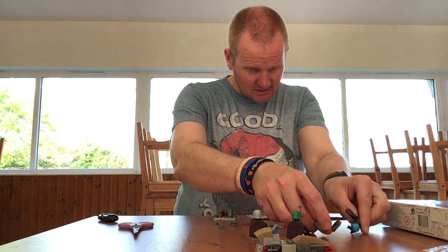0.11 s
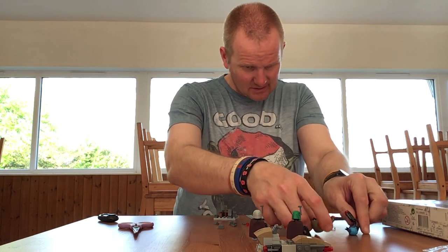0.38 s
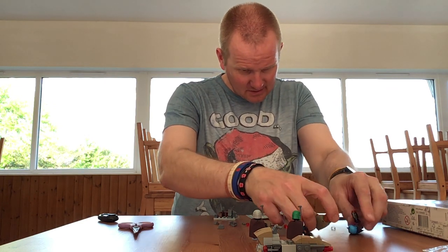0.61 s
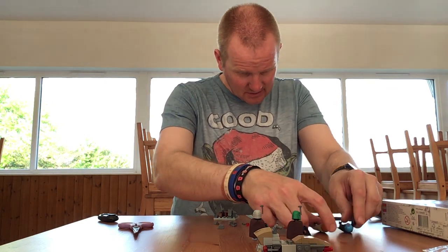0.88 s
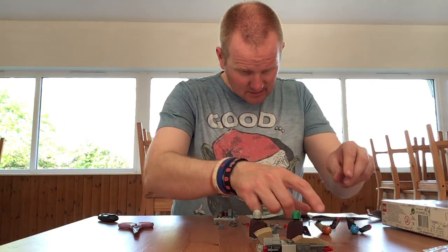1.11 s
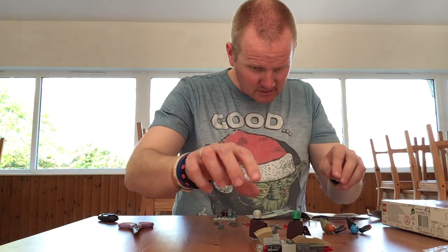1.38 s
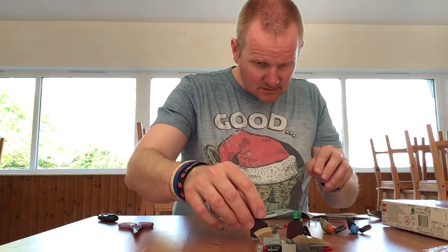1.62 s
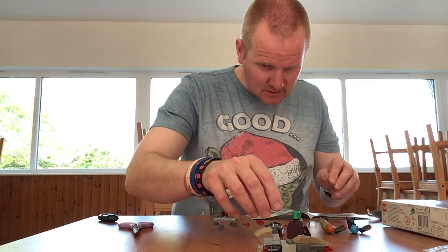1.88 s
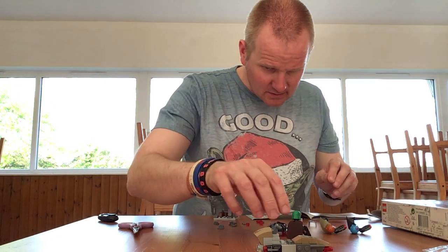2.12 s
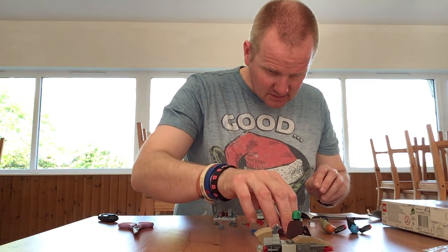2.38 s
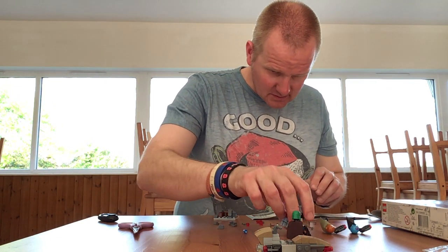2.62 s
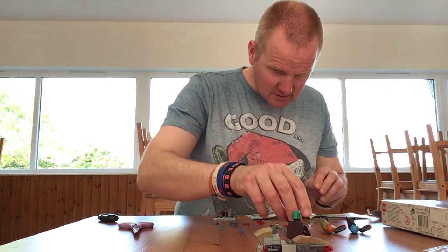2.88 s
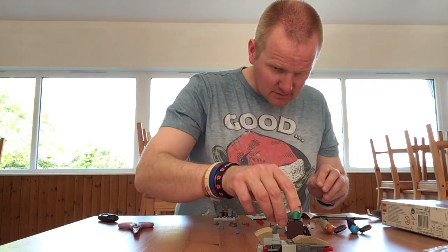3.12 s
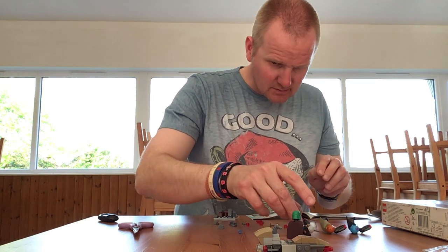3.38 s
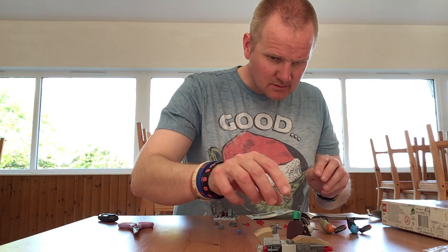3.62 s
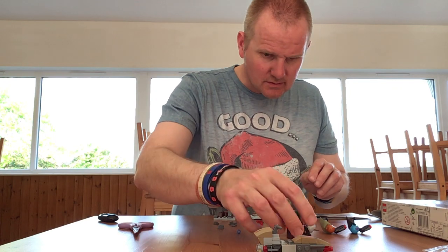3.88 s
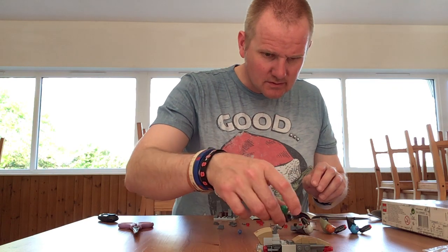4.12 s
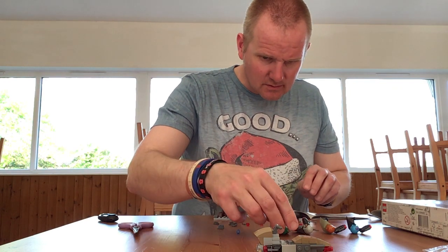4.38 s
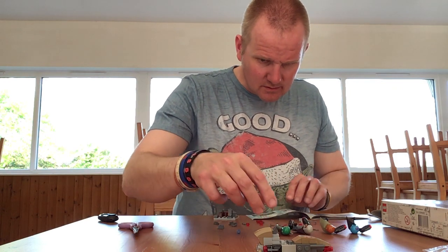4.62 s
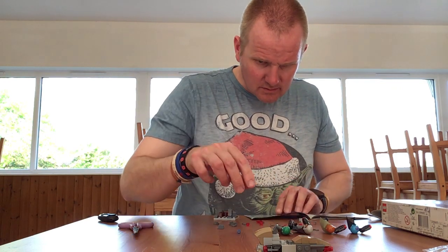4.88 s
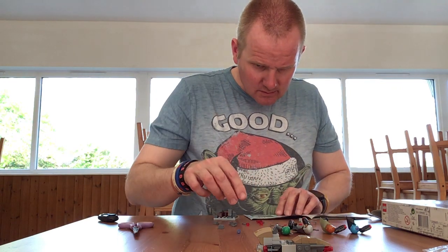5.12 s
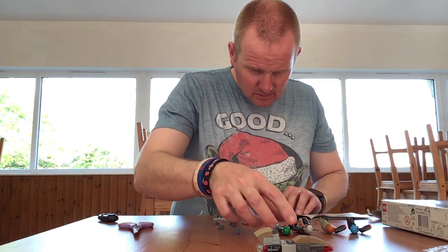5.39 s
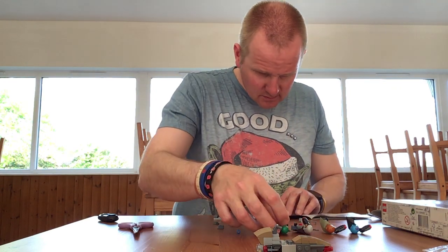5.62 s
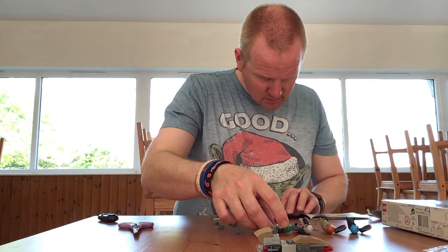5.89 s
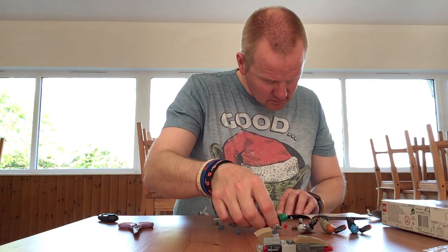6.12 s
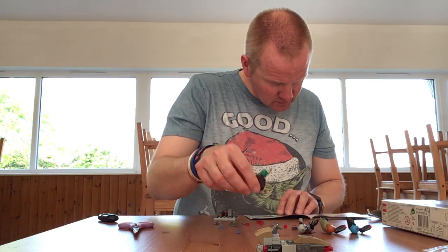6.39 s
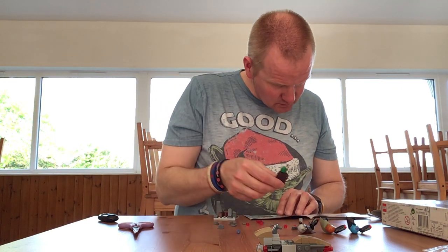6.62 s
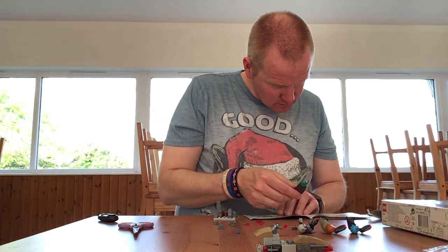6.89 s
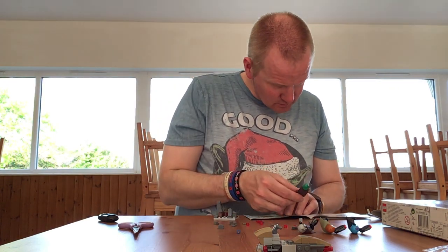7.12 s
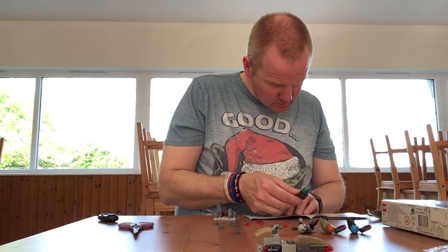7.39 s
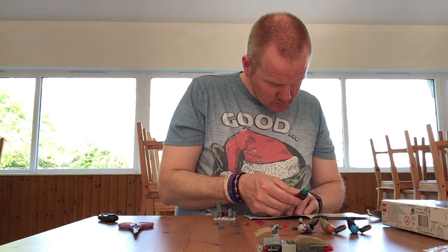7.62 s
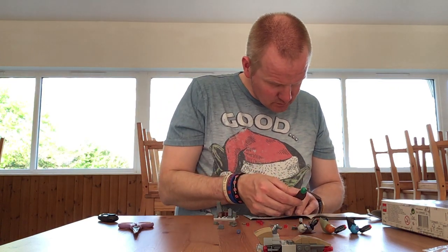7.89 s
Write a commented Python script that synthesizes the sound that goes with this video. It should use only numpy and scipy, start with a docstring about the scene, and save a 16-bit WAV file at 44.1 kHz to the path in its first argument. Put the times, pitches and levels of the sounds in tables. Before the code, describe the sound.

Small hollow plastic pieces are handled on a wooden table in a bare, reverberant hall. A knock and short slides come first, then a cluster of bright clacks peaking at two seconds. Scattered knocks, scrapes and rubs follow, thinning out until one last clear click near six seconds, then quiet room noise. A single nearby microphone picks up each contact with its echo.

```python
"""Small plastic toy pieces are pushed, dropped and knocked over on a wooden table in a bare hall.
Over a quiet noise floor the first push slides along the table: tiny slips excite its resonant modes,
and the hall's decaying noise tail follows each sound. Then come low thumps, rustling rubs, clicks of hollow
plastic and knocks of the table top, all sums of damped modes; the hardest click falls near 2 s.
Sparser contacts follow until the last rub, and the floor remains."""
import sys
import numpy as np
from scipy import signal
from scipy.fft import rfft, irfft, next_fast_len
from scipy.io import wavfile

SR = 44100
rng = np.random.default_rng(int(sys.argv[2]) if len(sys.argv) > 2 else 0)


def ratio(d):
    """dB to gain"""
    e = np.asarray(d, float) / 20
    return 10 ** e


def pcm_store(signal):
    """Save signal as 16-bit PCM."""
    levels = np.round(np.clip(np.atleast_2d(signal), -1, 1) * 32767)
    wavfile.write(sys.argv[1], SR, levels.astype(np.int16).T)


N = 353354

# Spectral shape of the floor: frequency_hz, relative_density_db (per Hz)
FLOOR_SPECTRUM = [(15, -61), (25, -21), (35, -43.5), (49, -6), (189, -2), (262, -5), (299, -9.5),
                  (333, -8.5), (528, -14.5), (791, -21.5), (2970, -26), (12100, -34), (15800, -41)]
# Pieces pushed over the table top: start_s, length_s, level_db, favoured_hz
TABLE_SLIDES = [(0, 0.71, -63, 478), (0.707, 0.067, -60, 575), (0.742, 0.08, -53.5, 400),
                (0.757, 0.11, -61, 1265), (0.798, 0.045, -53.5, 1050), (0.825, 0.092, -51, 467),
                (0.912, 0.042, -50, 588), (0.969, 0.078, -60, 433), (1.177, 0.067, -54.5, 497),
                (1.302, 0.18, -63, 1185), (1.552, 0.29, -64, 636), (2.388, 0.06, -54, 430),
                (2.449, 0.08, -48.5, 603), (2.544, 0.16, -44.5, 627), (2.924, 0.086, -54, 660),
                (3.031, 0.046, -55.5, 654), (3.315, 0.13, -61.5, 615), (3.62, 0.046, -67, 607),
                (4.347, 0.15, -71, 770), (5.414, 0.3, -65.5, 404), (5.689, 0.16, -59, 442),
                (5.79, 0.098, -56, 400), (5.844, 0.19, -60, 453), (5.962, 0.26, -66, 480)]
# Pieces landing on the table: contact_s, knock_db, favoured_hz, upper_modes_db (relative to the knock),
# skid_db (sliding after the landing)
TABLE_KNOCKS = [(0.267, -30.5, 484.7, 5, -47.5), (0.464, -58, 467, 11, -72), (0.877, -42.5, 534, -21, -77),
                (1.061, -45, 455, 10.5, -47.5), (1.132, -49.5, 466, -11, -48), (1.146, -43, 464, -2, -54),
                (1.408, -53, 466, -14, -56), (1.443, -57, 468, 3, -49), (1.716, -45.5, 660, -7, -60.5),
                (1.826, -38, 656, 1, -42.5), (1.873, -39, 1005, 8, -43.5), (1.973, -43.5, 520, 11.5, -38.5),
                (2.0, -36.5, 618, 20, -37), (2.054, -35, 506, 13, -35.5), (2.414, -40, 442.6, 3, -63),
                (2.554, -50, 660, 9, -56), (2.7, -52, 613, -5, -53.5), (2.666, -45, 611, 3.5, -51),
                (2.86, -32.5, 535, 6, -45.5), (2.887, -47, 825, 10.5, -44), (3.395, -60, 604, -8, -52),
                (3.416, -45.5, 665, -21, -66.5), (3.521, -58.5, 610, -13, -65),
                (4.241, -65, 1220, 6, -58.5), (4.289, -36, 607, -17, -44), (4.3, -34.5, 754, -6, -45),
                (4.317, -38, 770, -17, -52.5), (4.514, -54, 467, -19, -61), (4.565, -66, 590, -5, -67),
                (5.539, -56, 443, -1, -67), (5.632, -61.5, 654, 4, -59.5), (5.979, -63, 610, -10.5, -64),
                (6.052, -62, 610, -8, -59), (6.079, -46.5, 632, -16, -44.5), (6.122, -57, 633, 10, -50),
                (6.128, -51.5, 1265, 7, -68)]
# Modes of the table top: mode_hz, relative_level_db, t60_s
TABLE_MODES = [(330, -3, 0.63), (358, -5, 0.28), (430, -6, 0.088), (468, -1.5, 0.072), (515, 2, 0.0094),
               (561, -10, 0.017), (608.3, -1, 0.12), (660, -5, 0.072), (720, -9, 0.058), (770, -1.5, 0.063),
               (845, -7.5, 0.12), (930, -3.5, 0.019), (1054, -3, 0.028), (1182, -3, 0.013),
               (1265, -2, 0.032), (1426, -9, 0.089), (1630, -1.5, 0.0076), (1950, -22.5, 0.09)]
# Reverberation time of the hall: frequency_hz, t60_s
HALL_DECAY = [(100, 2.1), (400, 1), (1300, 1.17), (3000, 1.3), (5000, 1.1), (9000, 0.64), (14000, 0.5)]
# Hall tail against the direct sound, before its build-up: frequency_hz, level_db
HALL_LEVEL = [(100, -14), (400, -12), (1300, -6.5), (3000, -10.5), (5000, -7), (9000, -8), (14000, -9.5)]
# Hand or heavy piece pressing on the table: contact_s, level_db
HAND_THUMPS = [(0.121, -67), (0.176, -68.5), (0.265, -68), (0.837, -78), (1.146, -69), (1.825, -62.5),
               (1.871, -62.5), (1.973, -62), (2.001, -55), (2.054, -58.5), (2.415, -74), (2.886, -67.5),
               (4.3, -61.5), (4.513, -61.5), (4.565, -66.5), (5.539, -71.5), (5.631, -70), (5.978, -70),
               (6.08, -63.5), (6.123, -74)]
# Lowest modes of the table: mode_hz, relative_level_db, t60_s
LOW_TABLE_MODES = [(78, 1, 0.11), (120.3, 2, 0.58), (171.6, -1.5, 0.21), (225.7, -2, 0.25),
                   (280.5, -9.5, 0.23)]
# Pieces rubbing on each other and on fingers: start_s, length_s, body_db, rustle_db, rustle_hz
PIECE_RUBS = [(0.203, 0.28, -71.5, -71.5, 7550), (0.262, 0.029, -54.5, -54, 9500),
              (0.743, 0.1, -63, -67, 9370), (0.797, 0.098, -58.5, -66.5, 7300),
              (0.927, 0.16, -91, -75.5, 7500), (1.057, 0.059, -71, -63.5, 9500),
              (1.131, 0.13, -72, -67.5, 9500), (1.303, 0.19, -74.5, -76, 7390),
              (1.442, 0.055, -78, -67.5, 9700), (1.563, 0.17, -65, -71.5, 7700),
              (1.706, 0.17, -71.5, -69.5, 7540), (1.824, 0.027, -61.5, -60, 8150),
              (1.865, 0.074, -56, -59, 9400), (1.967, 0.055, -60, -65, 9450), (2.01, 0.1, -62, -63, 9600),
              (2.079, 0.039, -47.5, -66, 7000), (2.403, 0.045, -58, -61.5, 9300),
              (2.438, 0.13, -65, -66, 7900), (2.549, 0.2, -66, -69, 6840), (2.73, 0.34, -75.5, -72, 7460),
              (2.883, 0.034, -63, -59.5, 9500), (2.921, 0.06, -65, -63.5, 8400),
              (3.036, 0.03, -70, -66, 8200), (3.29, 0.11, -74, -73.5, 8500),
              (3.38, 0.11, -68.5, -72.5, 7800), (3.996, 0.048, -74, -68, 9550),
              (4.243, 0.1, -71.5, -81, 6730), (4.285, 0.049, -58, -60.5, 7800),
              (4.304, 0.048, -52.5, -57.5, 11030), (4.505, 0.024, -74.5, -66, 6390),
              (4.563, 0.024, -70, -57, 10000), (5.403, 0.81, -75.5, -78.5, 7700),
              (5.723, 0.2, -66.5, -75, 7100), (5.835, 0.5, -77.5, -75, 7300),
              (6.064, 0.09, -66.5, -59, 7540), (6.115, 0.036, -49, -62, 6940),
              (6.162, 0.09, -67.5, -61, 6900), (6.324, 0.063, -79, -67, 7350),
              (6.416, 0.078, -80.5, -70, 7300), (6.682, 0.066, -85, -73.5, 7470)]
# Modes of the hollow pieces: mode_hz, relative_level_db, t60_s
PIECE_MODES = [(2020, -2.5, 0.01), (2260, -5, 0.086), (2600, -4, 0.054), (2820, -3.5, 0.093),
               (3013, -7, 0.066), (3184, -6.5, 0.038), (3540, -3.5, 0.051), (3840, -1.5, 0.026),
               (4400, -5.5, 0.045), (4810, -3.5, 0.036), (5000, -6.5, 0.024), (5330, -2, 0.0077),
               (5880, -1, 0.0049), (6790, -9.5, 0.017), (7580, -12, 0.012), (8200, -16.5, 0.0065),
               (8230, -8, 0.0045), (9450, -13.5, 0.0054), (9510, -11.5, 0.0073), (10500, -10, 0.0048),
               (11070, -12.5, 0.0092), (11600, -21, 0.006), (13200, -14.5, 0.0062), (13900, -49, 0.0036)]
# Plastic on plastic: contact_s, level_db, favoured_hz, upper_middle_db, treble_db (both relative to level_db)
PLASTIC_CLICKS = [(0.266, -38.5, 2600, 0.5, 9), (0.746, -61, 3300, 3, -1), (0.802, -52, 3520, 8, -7),
                  (0.8108, -57, 3400, -4.5, -6), (0.7532, -59, 2930, 3, 2), (0.85, -60, 3500, -9, -6),
                  (0.868, -53, 3520, -2, -4), (0.877, -60, 3000, -6, -6), (0.9327, -52.5, 3870, -4, 6),
                  (1.0622, -38.5, 9300, -14, -19), (1.1294, -42.5, 3540, -12, -4),
                  (1.1446, -43, 9600, -10.5, 3.5), (1.1634, -64, 9300, -8, 4),
                  (1.1836, -54.5, 3550, -0.5, -2), (1.4391, -59, 8700, -3, -5.5),
                  (1.567, -65, 3000, -8, -1), (1.714, -60, 7500, -15, 10), (1.8261, -47, 2600, -24, 9),
                  (1.8726, -27, 2676, -2, 6), (1.901, -40, 2770, -16, 1), (1.9144, -40, 2670, -14.5, -4),
                  (1.973, -44.5, 2200, 5, 14), (1.9998, -14, 2757, -9, 5.5), (2.0064, -23.5, 2190, -11, 5),
                  (2.0428, -37.5, 2800, -16.5, 2), (2.0538, -24.5, 2360, -6, 4.5),
                  (2.085, -28.5, 2400, -18, 2), (2.0984, -37, 2680, -17, 0), (2.41, -55, 4330, 5.5, -3),
                  (2.5463, -45.5, 3140, -15, -6), (2.5925, -50, 2800, -8.5, -0.5),
                  (2.859, -31, 2690, -9.5, -5), (2.8863, -41.5, 2720, -18, -3.5),
                  (2.929, -46, 2670, -7.5, 2.5), (3.041, -64.5, 8330, -17, 8),
                  (3.9963, -61.5, 7840, -11, 9), (4.291, -47, 2290, -10.5, 16.5),
                  (4.302, -41, 2290, -9, -1.5), (4.325, -42.5, 3530, -0.6, 0),
                  (4.5116, -62.5, 5930, 3.5, 11), (4.568, -62, 10000, -16, 1), (5.021, -59, 5830, -5, 5),
                  (5.121, -61.5, 2260, 3.5, -10.5), (5.5383, -61, 2700, 0, 5), (5.661, -63.5, 8000, -8, 12),
                  (5.73, -65, 2910, -3, 2), (6.0785, -51, 6760, 2.5, 2), (6.095, -61, 7880, 11.5, 21),
                  (6.122, -27, 2600, 3, 2)]
# Edge of a hard contact: mode_hz, relative_level_db, t60_s
CRACK_MODES = [(4100, -7, 0.0063), (9100, -14.5, 0.0018), (13600, -26, 0.0014)]

FLOOR_RMS_DB = -65.5
UPPER_FROM_HZ, TREBLE_FROM_HZ, TOP_FROM_HZ = 3300, 6200, 11500   # regions of the pieces' spectrum
HELD_T60_S, LOADED_T60_S = .008, .04   # longest ring of a piece lying in the heap, of the table under a blow
KNOCK_CHATTER_S, CLICK_CHATTER_S = .004, .0016   # scale of the random rebound spacing
SKID_S = .05   # how long a landed piece skids
GRIP_RING_SHARE, RUB_BODY_HZ = .45, 3100   # ring time left under fingers; centre of the stirred body modes
FIRST_TOUCH_DB, FIRST_REBOUND_DB, REBOUND_LOSS_DB = -8, -6, 1.8   # against the firm contact; loss per rebound
TOP_PER_DB, HARD_BLOW_DB = .3, -14   # extra loss of the top per dB that a blow is softer than a hard one


def at_hz(points, hz):
    """Interpolates a frequency table linearly on a logarithmic frequency axis."""
    table_hz, values = np.transpose(points)
    return np.interp(np.log(np.maximum(hz, 1)), np.log(table_hz), values)


def rms_one(x):
    """Normalises mean power to one."""
    return x / np.sqrt(np.mean(x ** 2) + 1e-20)


def low_cut(x, hz):
    """Second-order high-pass: attenuates the spectrum below its cutoff."""
    return signal.sosfilt(signal.butter(2, hz, "high", fs=SR, output="sos"), x)


def high_cut(x, hz):
    """Second-order low-pass: attenuates the spectrum above its cutoff."""
    return signal.sosfilt(signal.butter(2, hz, fs=SR, output="sos"), x)


def ring(impulses, hz, t60):
    """Damped resonator: a unit impulse excites a decaying sine of initial height 1."""
    radius = ratio(-60 / (t60 * SR))
    angle = 2 * np.pi * hz / SR
    feedback = [1, -2 * radius * np.cos(angle), radius * radius]
    return signal.lfilter([0, np.sin(angle)], feedback, impulses + 1e-18)


def favour(modes, hz, octave_db, peak_db):
    """Modal selectivity: a contact excites most the modes nearest its favoured pitch."""
    octaves = np.abs(np.log2(np.array(modes)[:, 0] / hz[:, None]))
    slope_db = -octave_db * np.minimum(octaves, 1.3)
    return slope_db + peak_db * np.exp(-(octaves / .06) ** 2)


def strike(times, chatter_s, strength_db, modes, longest_s=1):
    """Impact excitation: light touch, firm contact and weaker rebounds; strength_db is blows x modes."""
    gaps = .2 + rng.random((len(times), 8))
    lag = np.cumsum(gaps, axis=1) / 2 * chatter_s
    contact_s = times[:, None] + lag - lag[:, 1:2]      # the firm contact, second in line, falls on the listed time
    at = np.clip((contact_s * SR).astype(int), 0, N - 1)
    push_db = np.r_[FIRST_TOUCH_DB, 0, FIRST_REBOUND_DB - REBOUND_LOSS_DB * np.arange(6)]
    out = np.zeros(N)
    for k, (hz, db, t60) in enumerate(modes):
        spot_db = 2.0 * rng.standard_normal(at.shape)      # each touch meets the mode at another spot
        impulses = np.zeros(N)
        np.add.at(impulses, at, ratio(push_db + spot_db + db + strength_db[:, k:k + 1]))
        sense = (-1) ** k      # neighbouring modes move in opposite senses
        out += sense * ring(impulses, hz, min(t60, longest_s))
    return out


def scrape(starts, lengths, level_db, focus_db, modes, per_s, ring_share, grit_db):
    """Frictional excitation: dense, uneven slips drive the modes under a quickly rising, fading pressure."""
    sizes = ratio(grit_db * np.minimum(rng.exponential(1, N), 5)) * rng.choice([-1, 1], N)
    slips = rms_one(sizes * (rng.random(N) < per_s / SR))
    dealt = rng.integers(0, 3, N)      # each slip reaches one third of the modes
    share = ratio(np.array(modes)[:, 1] + focus_db)
    share *= ratio(level_db)[:, None] / np.sqrt(np.sum(share ** 2, axis=1, keepdims=True))
    out = np.zeros(N)
    for k, (mode_hz, _, t60) in enumerate(modes):
        pressure = np.zeros(N)
        for start, length, gain in zip(starts, lengths, share[:, k]):
            u = np.linspace(0, 1, max(int(length * SR), 2))      # progress through the stroke
            first = int(start * SR)
            envelope = np.minimum(u / 0.021, 1) * np.minimum((1 - u) / 0.66, 1)
            pressure[first:first + len(u)] += gain * envelope
        ring_s = t60 * ring_share
        even_power = np.sqrt(12 * np.log(1000) / (ring_s * SR))      # offsets ring time and the one-third share
        out += ring(slips * (dealt == k % 3) * pressure, mode_hz, ring_s) * even_power
    return out


def floor():
    """Stationary noise: random phases under a fixed spectrum give building rumble and microphone hiss."""
    size = next_fast_len(N)
    shape = ratio(at_hz(FLOOR_SPECTRUM, np.arange(size // 2 + 1) * SR / size))
    noise = irfft(rfft(rng.standard_normal(size)) * shape, size)[:N]
    return ratio(FLOOR_RMS_DB) * rms_one(noise)


def slides():
    """Sliding friction: pushed pieces, and landed pieces that skid, excite the table's modes."""
    skids = [(s, SKID_S, skid_db, hz) for s, _, hz, _, skid_db in TABLE_KNOCKS]
    s, length, db, hz = np.transpose(list(TABLE_SLIDES) + skids)
    focus_db = favour(TABLE_MODES, hz, octave_db=10.0, peak_db=7.0)      # a light piece stirs mostly one mode
    table = scrape(s, length, db, focus_db, TABLE_MODES, per_s=4000.0, ring_share=1.22, grit_db=2.5)
    return low_cut(high_cut(table, hz=2200.), hz=224.0)


def hall(x, gap_s=0.004, build_s=0.0066):
    """Reverberation: noise builds up after the first wall echo and decays exponentially band by band."""
    t = np.arange(SR * 3 // 2) / SR
    edges = 60 * 2 ** np.arange(0, 8.1, .5)      # half-octave bands
    tail = np.zeros(len(t))
    for low, high in zip(edges, edges[1:]):
        band_filter = signal.butter(2, [low, high], "band", fs=SR, output="sos")
        band = signal.sosfilt(band_filter, rng.standard_normal(len(t)))
        hz = np.sqrt(low * high)
        t60 = at_hz(HALL_DECAY, hz)
        decay = ratio(at_hz(HALL_LEVEL, hz) - 60 * t / t60)
        tail += band * decay * np.sqrt(2 * np.log(1000) / (t60 * SR))      # equal energy for any t60
    tail *= 1 - np.exp(-np.maximum(t - gap_s, 0) / build_s)
    return signal.fftconvolve(x, tail)[:N]


def thumps():
    """Low-mode excitation: the weight of a hand or heavy piece sets the table's lowest modes ringing."""
    s, db = np.transpose(HAND_THUMPS)
    strength_db = np.outer(db, np.ones(len(LOW_TABLE_MODES)))
    thump = strike(s, 0, strength_db, LOW_TABLE_MODES)      # zero spacing: all touches coincide
    return high_cut(thump, hz=400.)


def rubs():
    """Friction between pieces and fingers: slips excite the damped hollow bodies and a fine treble rustle."""
    s, length, body_db, rustle_db, rustle_hz = np.transpose(PIECE_RUBS)
    low = [mode for mode in PIECE_MODES if mode[0] < TREBLE_FROM_HZ]
    high = [mode for mode in PIECE_MODES if mode[0] > TREBLE_FROM_HZ]
    broad_db = favour(low, np.full(len(s), RUB_BODY_HZ), octave_db=5.0, peak_db=4)
    bodies = scrape(s, length, body_db, broad_db, low, per_s=900.0, ring_share=GRIP_RING_SHARE, grit_db=1.0)
    fine_db = favour(high, rustle_hz, octave_db=9.0, peak_db=7.0)
    rustle = scrape(s, length, rustle_db, fine_db, high, per_s=1500.0, ring_share=.7, grit_db=1.0)
    bodies = low_cut(high_cut(bodies, hz=7500.), hz=1540.0)
    return bodies + low_cut(high_cut(rustle, hz=12970.0), hz=4440.0)


def clicks():
    """Impact of hard faces: short body modes and a contact crack, with more top the harder the blow."""
    s, db, hz, upper_db, treble_db = np.transpose(PLASTIC_CLICKS)
    pitch = np.array(PIECE_MODES)[:, 0]
    top_db = TOP_PER_DB * (db - HARD_BLOW_DB)
    tilt_db = np.outer(upper_db, (pitch > UPPER_FROM_HZ) & (pitch < TREBLE_FROM_HZ))
    tilt_db += np.outer(treble_db, pitch > TREBLE_FROM_HZ)
    tilt_db += np.outer(top_db, pitch > TOP_FROM_HZ)
    strength_db = db[:, None] + tilt_db + favour(PIECE_MODES, hz, octave_db=8.0, peak_db=7.5)
    body = strike(s, CLICK_CHATTER_S, strength_db, PIECE_MODES, HELD_T60_S)
    crack_db = db[:, None] + np.stack([upper_db, treble_db, treble_db + top_db], axis=1)
    crack = strike(s, CLICK_CHATTER_S, crack_db, CRACK_MODES)
    return low_cut(high_cut(body + crack, hz=13000.), hz=1300.)      # small pieces move no air at low pitch


def knocks():
    """Plate impact: a landing piece excites the table's modes according to where it lands."""
    s, db, hz, upper_db, _ = np.transpose(TABLE_KNOCKS)
    tilt_db = np.outer(upper_db, np.array(TABLE_MODES)[:, 0] > 900)
    strength_db = db[:, None] + tilt_db + favour(TABLE_MODES, hz, octave_db=5.5, peak_db=10.0)
    top = strike(s, KNOCK_CHATTER_S, strength_db, TABLE_MODES, LOADED_T60_S)
    return low_cut(high_cut(top, hz=2600.), hz=239.0)      # wood takes no sharp edge


def scene():
    """Superposition: the direct sound, its hall tail and the floor add in one channel."""
    toys = slides() + thumps() + rubs() + clicks() + knocks()
    return (toys + hall(toys) + floor())[None]


def low_pass(x):
    """Removes everything above the highest recorded frequency."""
    return signal.sosfilt(signal.butter(12, 15960, fs=SR, output="sos"), x)


def record(dry):
    """High-pass response: the microphone cuts the deepest bass."""
    mix = signal.sosfilt(signal.butter(5, 48, "high", fs=SR, output="sos"), dry)
    return low_pass(mix)


dry = scene()
out = record(dry)
pcm_store(out)
```